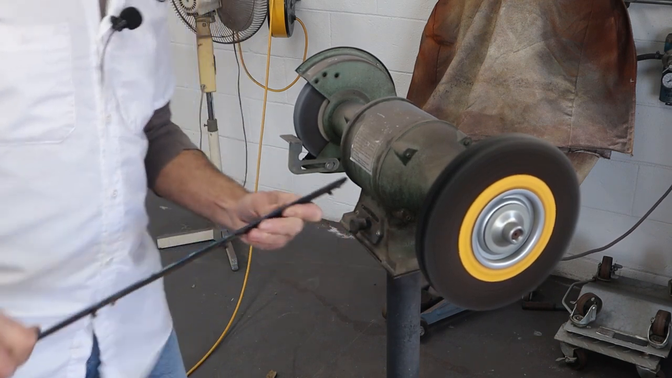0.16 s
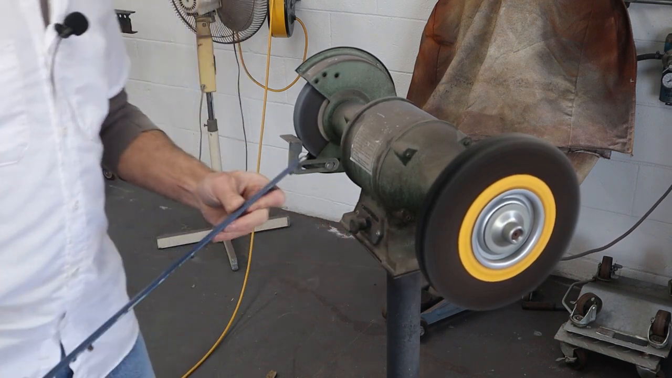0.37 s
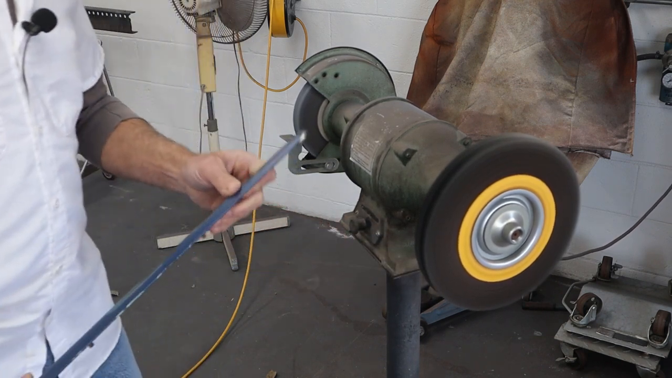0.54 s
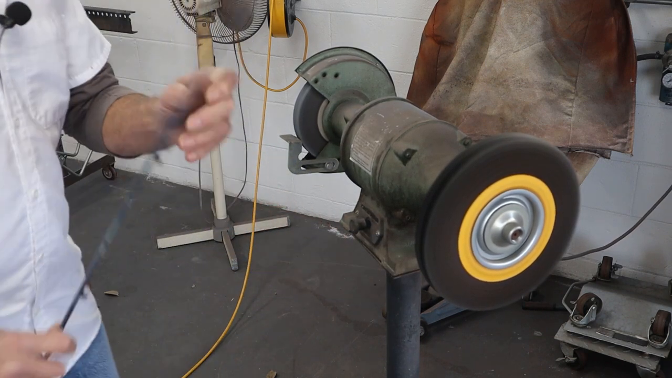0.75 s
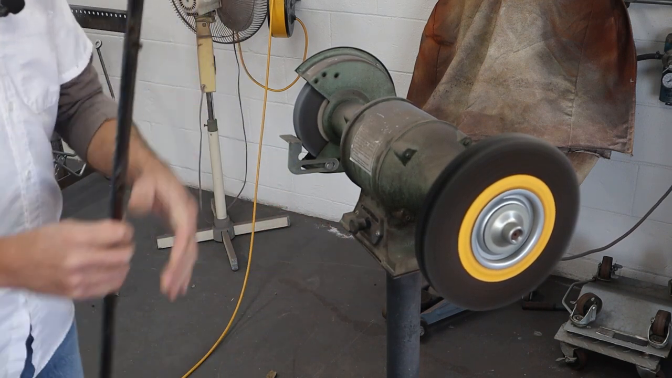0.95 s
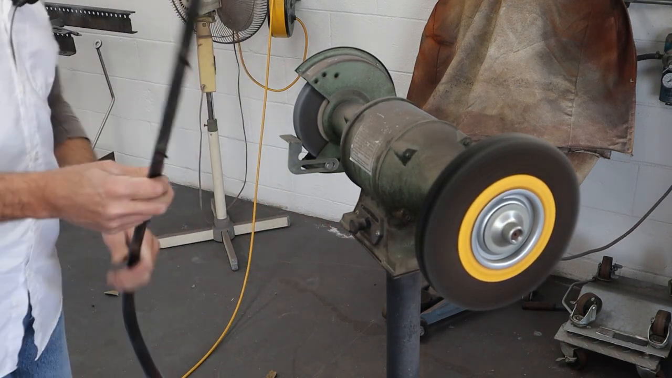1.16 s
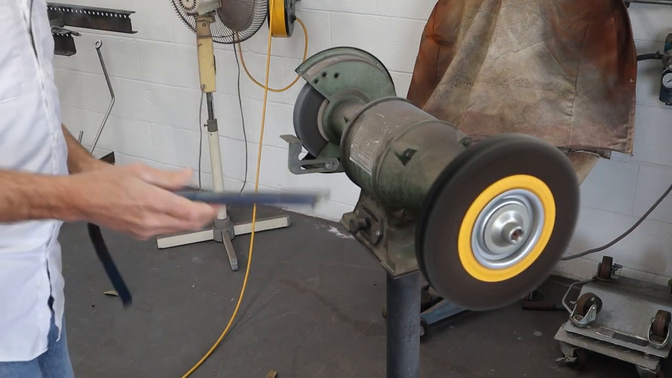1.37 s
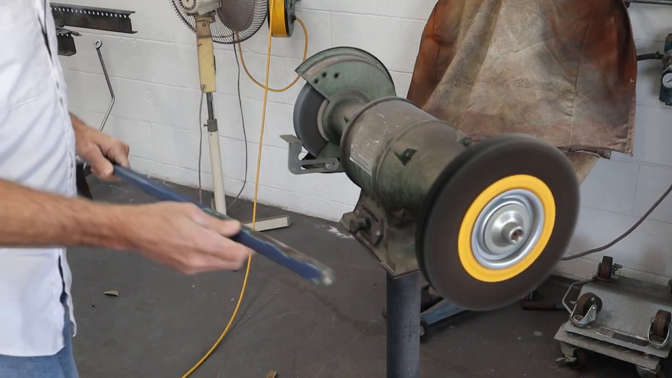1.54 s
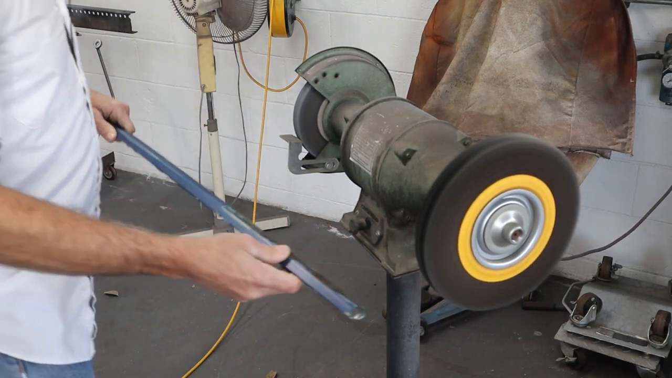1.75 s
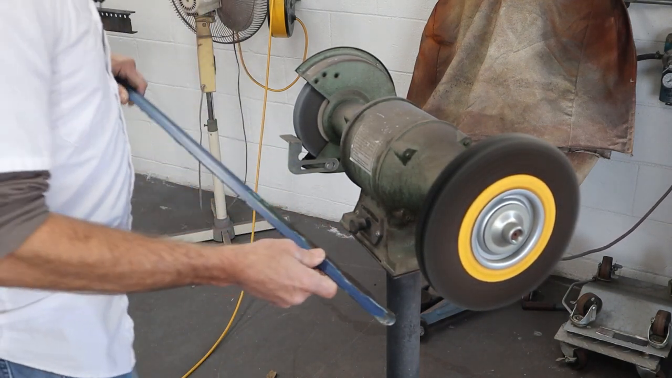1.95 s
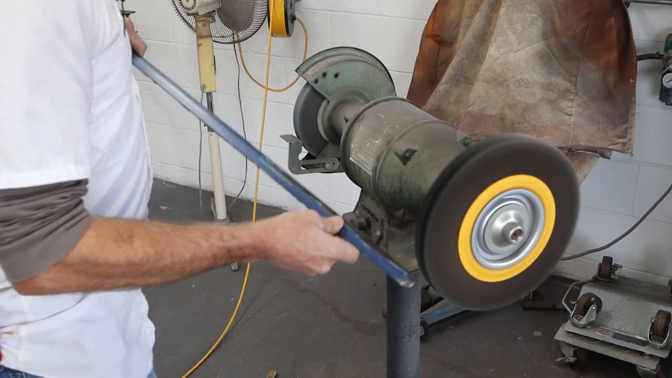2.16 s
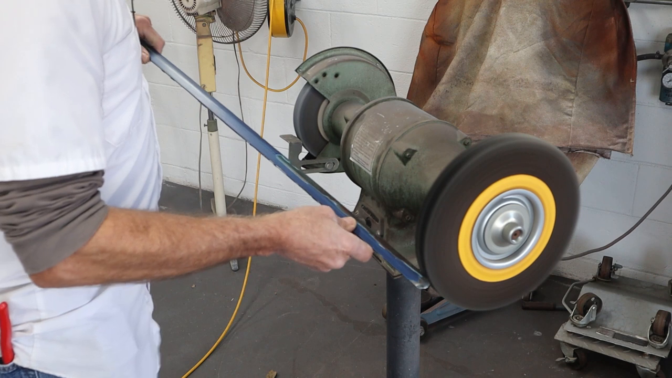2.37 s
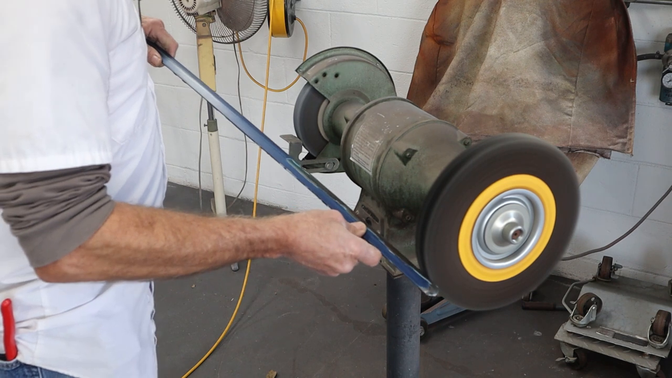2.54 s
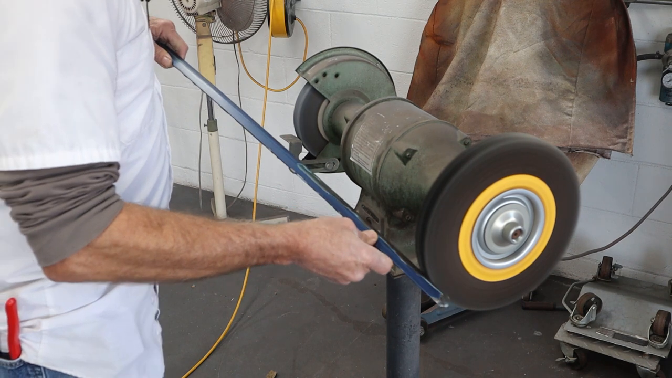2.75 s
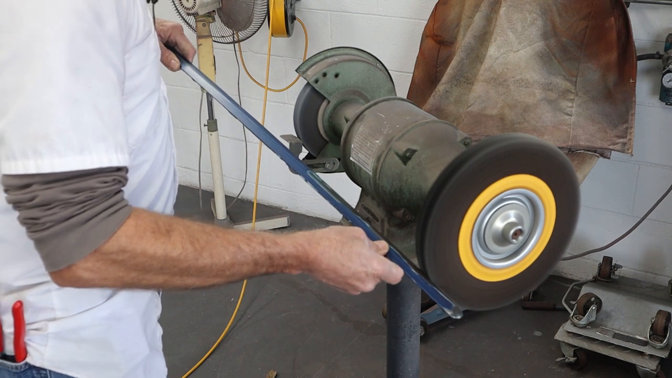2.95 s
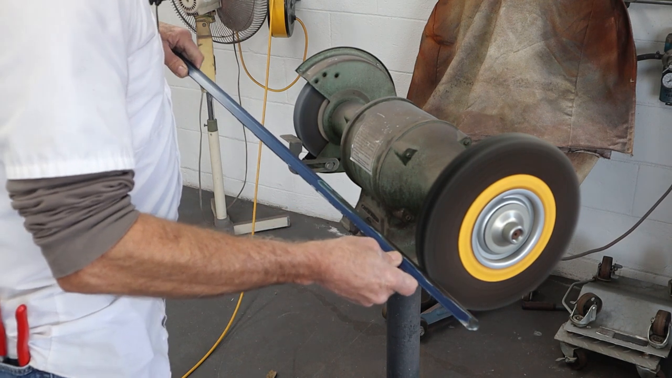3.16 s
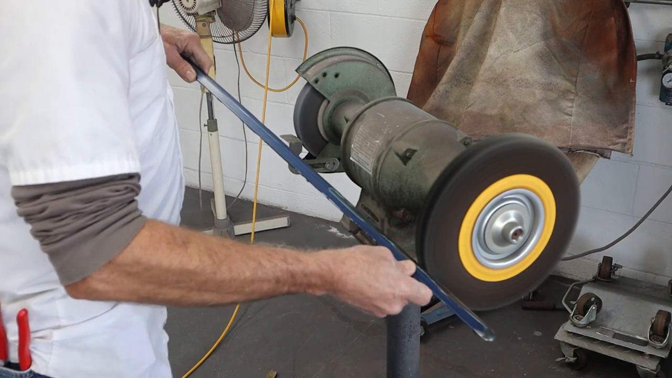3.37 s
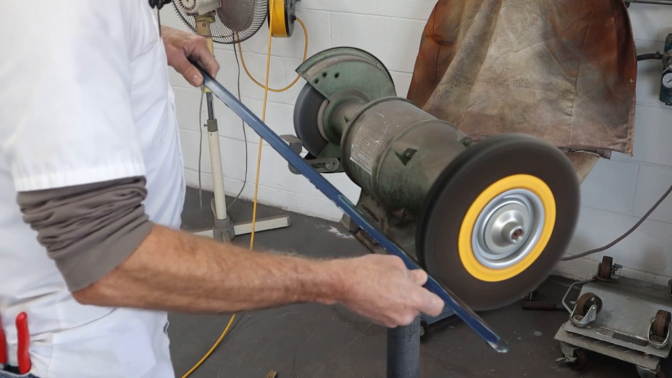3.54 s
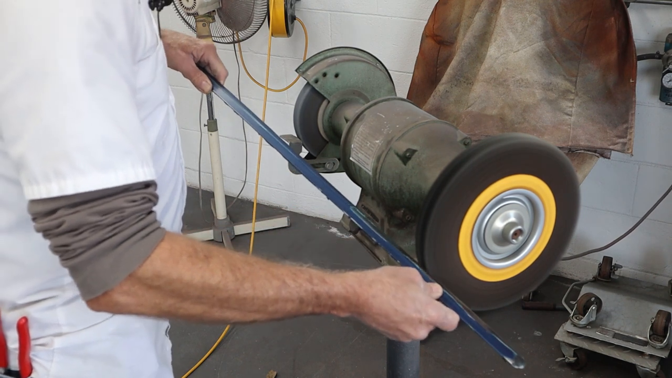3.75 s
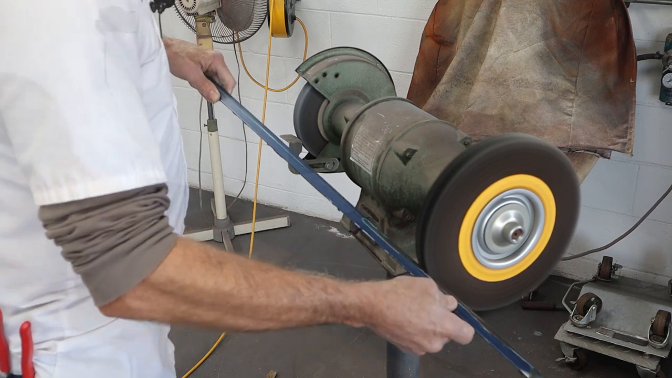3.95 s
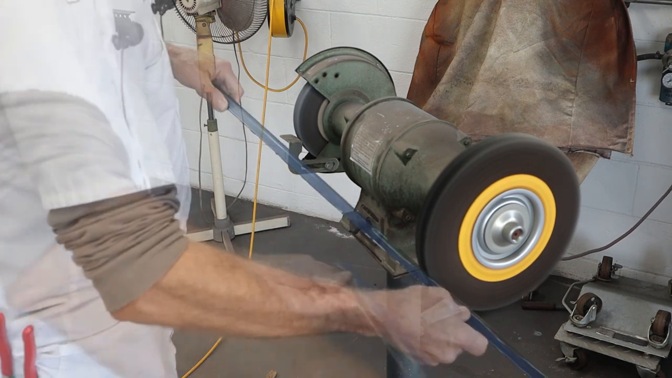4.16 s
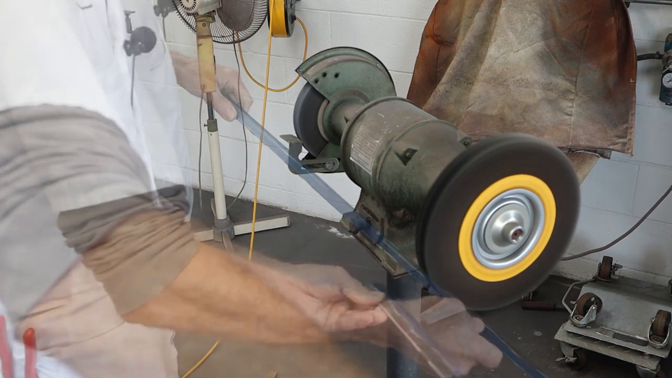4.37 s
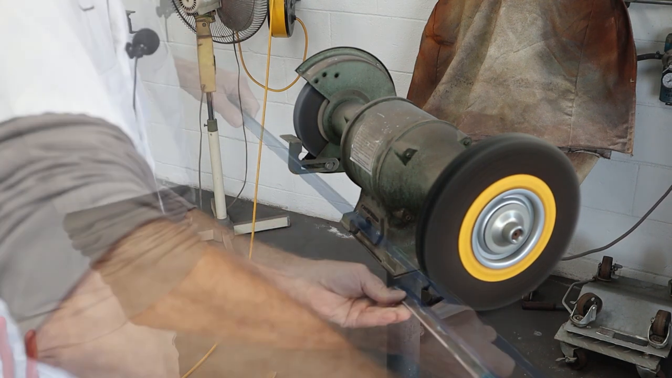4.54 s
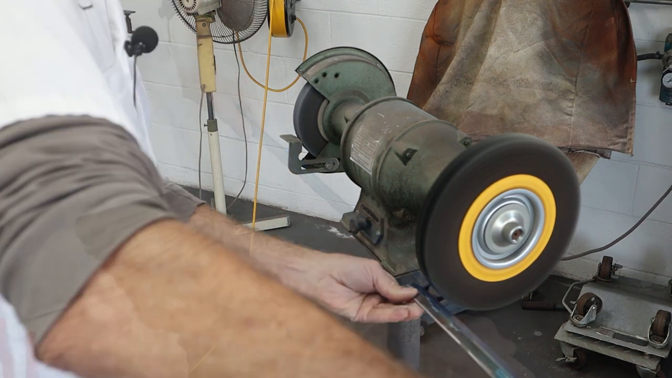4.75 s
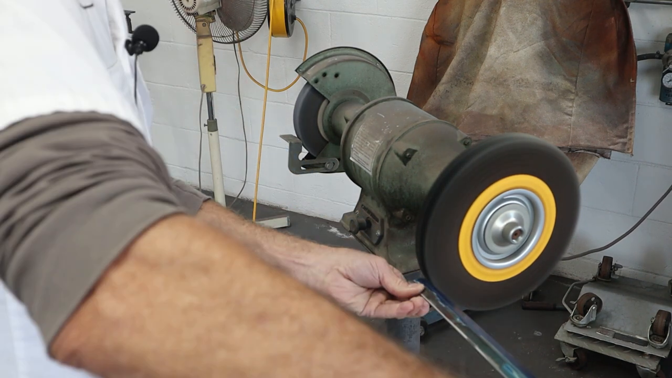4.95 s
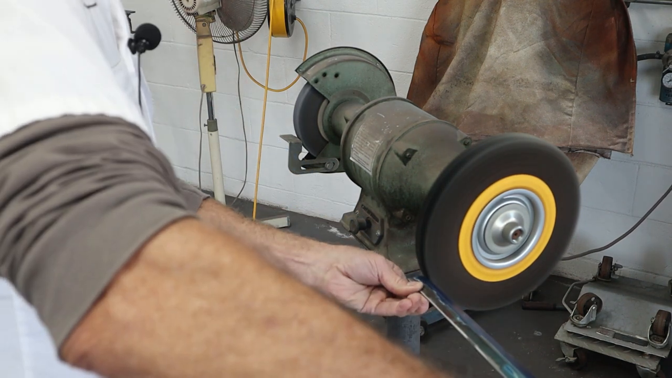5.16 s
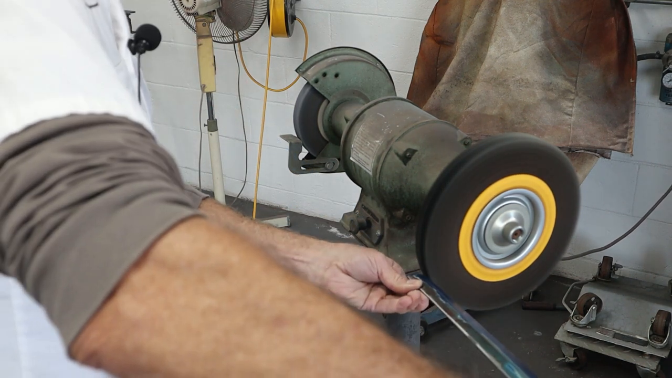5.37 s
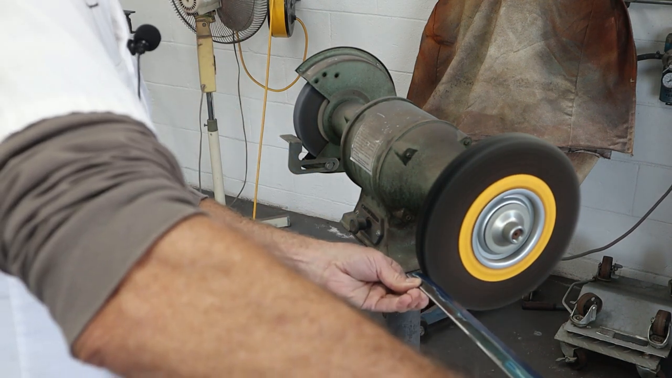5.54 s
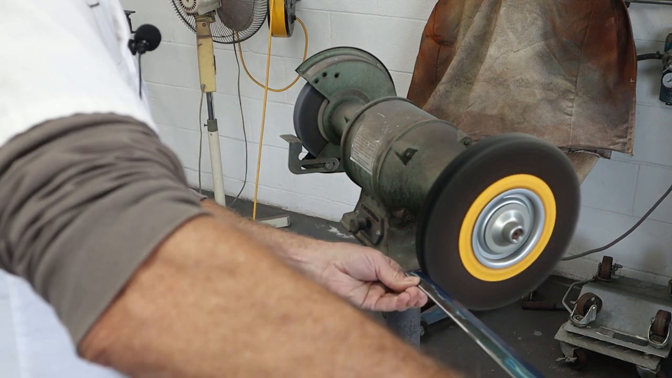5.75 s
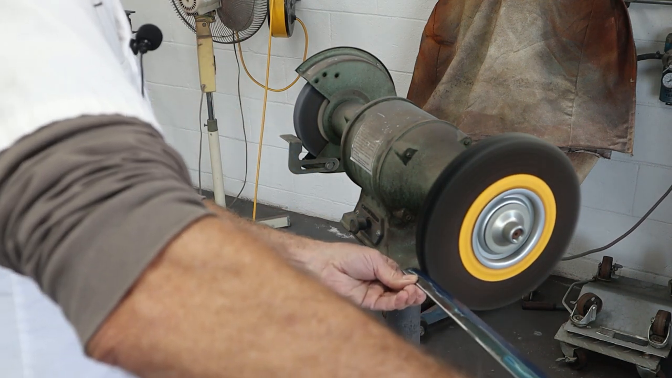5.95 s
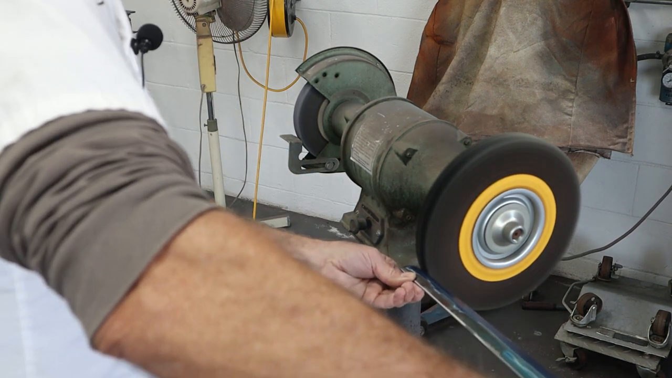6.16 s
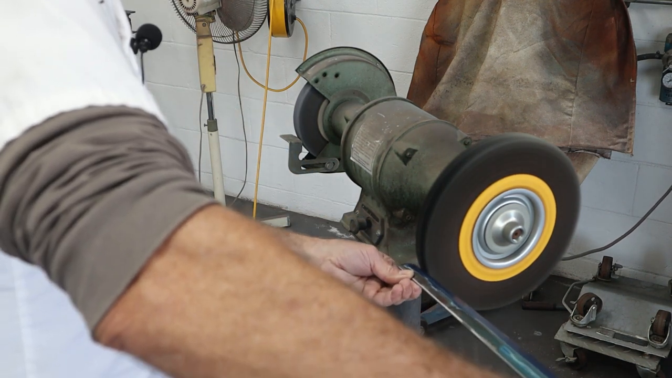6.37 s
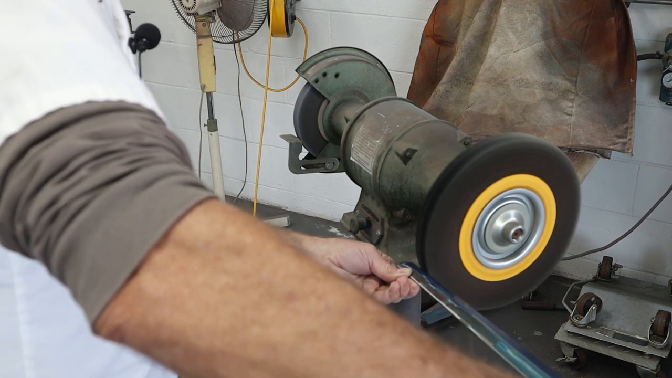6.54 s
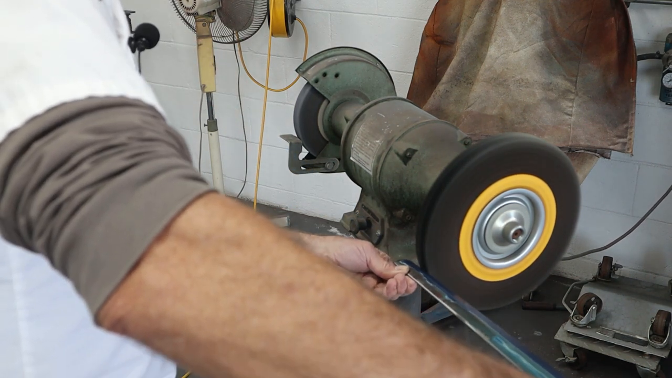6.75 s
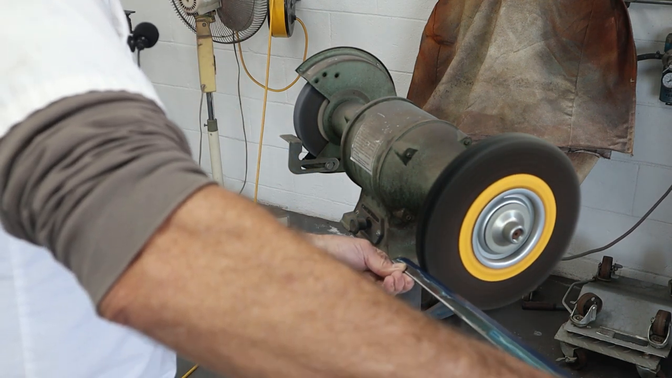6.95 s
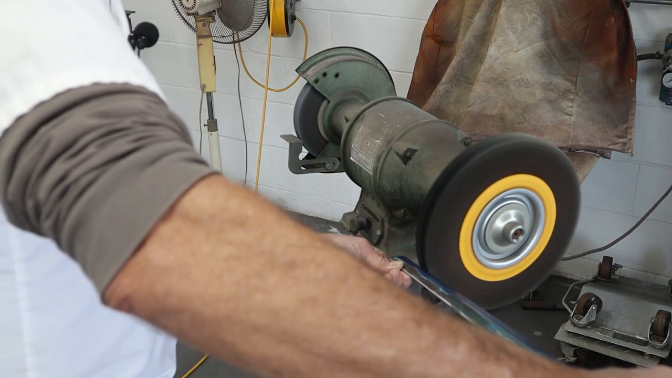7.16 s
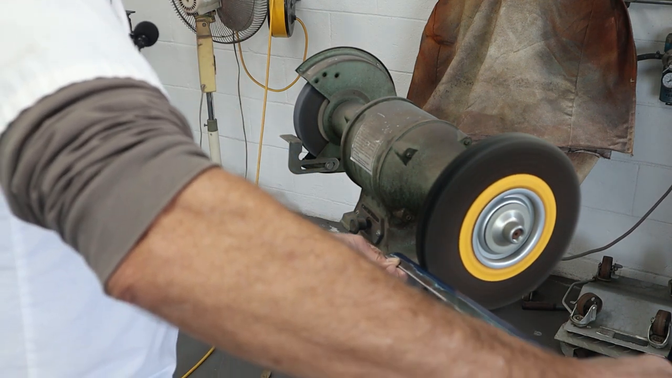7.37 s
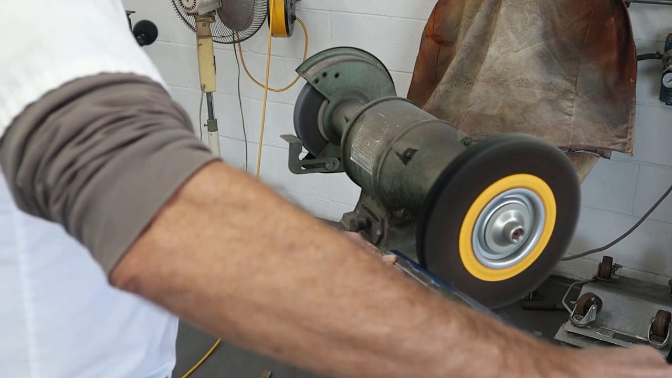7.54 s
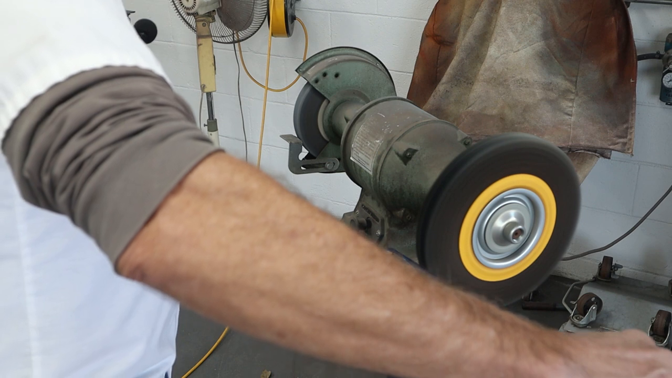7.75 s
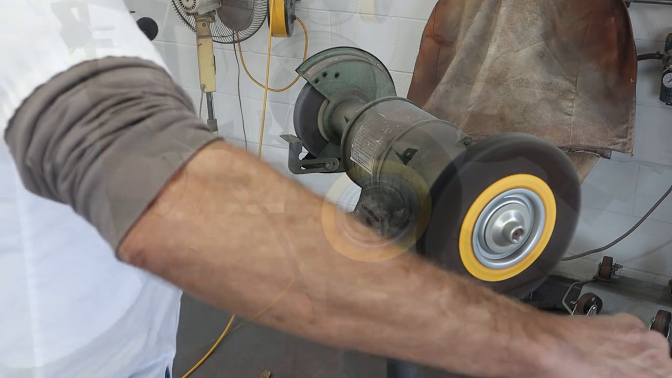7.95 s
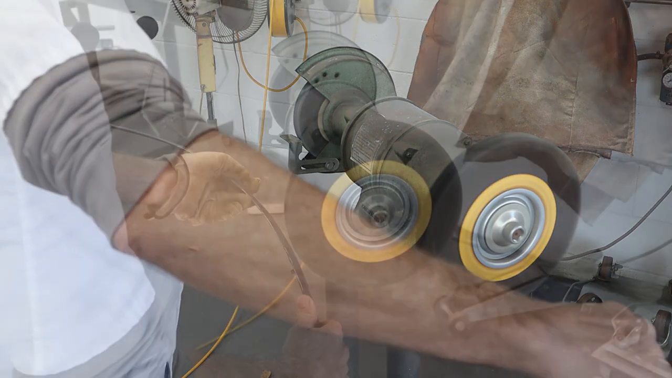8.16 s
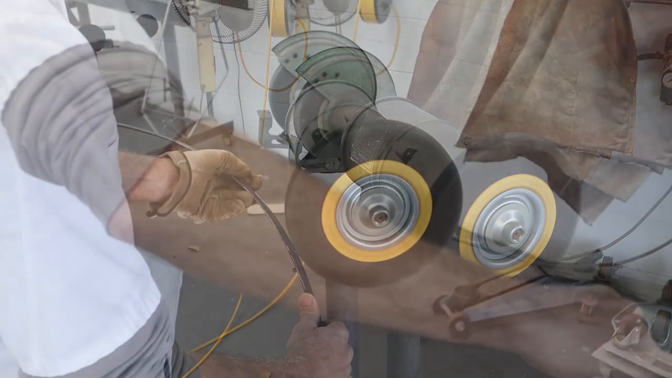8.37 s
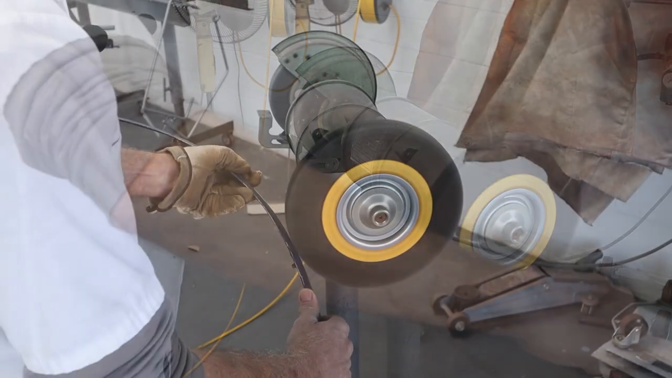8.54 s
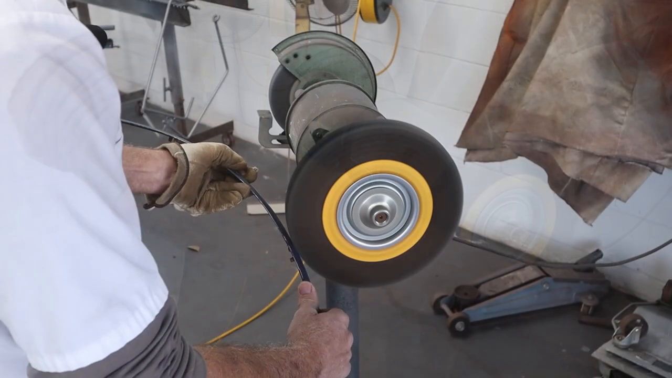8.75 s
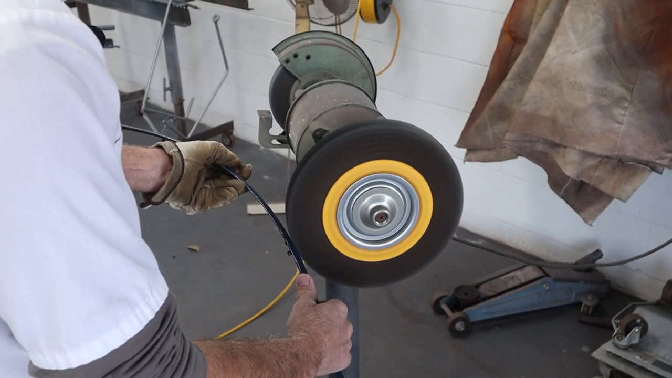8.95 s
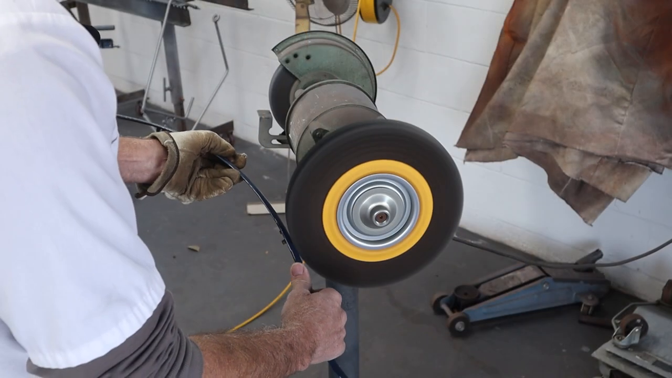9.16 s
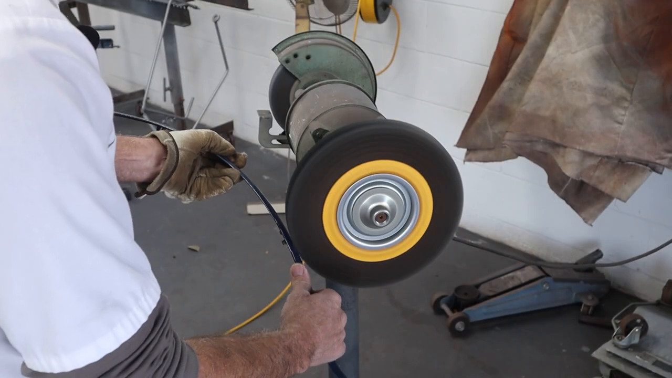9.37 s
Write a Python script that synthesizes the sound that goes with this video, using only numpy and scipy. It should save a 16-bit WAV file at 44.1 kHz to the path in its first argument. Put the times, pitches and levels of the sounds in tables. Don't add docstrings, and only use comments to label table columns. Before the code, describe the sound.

A bench grinder's wire wheel spins freely in a workshop, with a high breathy whistle, rushing air and a wavering motor hum. Soft low puffs of draught bump the lapel microphone until about 0.9 s, then the wheel is heard more cleanly. At 2.4 s a steel strip meets the bristles: a sudden loud, bright rasp, ringing and shifting in resonance, roughened by the rotation as the wheel slows. Wind thumps return from about 3.2 s. At 4.4 s the scrape cuts off and heavy, irregular low buffeting takes over the idling wheel. From 5.2 s a softer, thin, hissy scrape continues beneath these thuds, with brief dips in level. At 8.4 s the sound changes abruptly to a third, stronger scrape, with a buzzing body and a steady singing tone sinking slightly; the buffeting dies away and grinding continues to the end, about 9.4 s.

```python
import sys
import numpy as np
from scipy import signal
from scipy.fft import rfft, irfft, next_fast_len
from scipy.io import wavfile
from scipy.ndimage import uniform_filter1d, map_coordinates

SR = 44100
rng = np.random.default_rng(int(sys.argv[2]) if len(sys.argv) > 2 else 0)


def inscribe(sig):
    pcm = np.round(np.clip(np.atleast_2d(sig).T, -1, 1) * 32767)
    wavfile.write(sys.argv[1], SR, pcm.astype(np.int16))


def level_to_linear(level):
    exponent = np.asarray(level, float) / 20
    return 10 ** exponent


N = 414540


def unit(x):
    return x / np.sqrt(np.mean(x ** 2) + 1e-20)


def clock():
    return np.arange(N) / SR


def along(points, hz):
    f, v = np.transpose(points)
    return np.interp(np.log(hz + 1), np.log(f + 1), v)


def curves(rows, t=None):
    s, *columns = np.transpose(rows)
    t = clock() if t is None else t
    return [np.interp(t, s, column) for column in columns]


def wobble(rate):
    knots = rng.standard_normal(int(N * rate / SR) + 4)
    return map_coordinates(knots, [np.arange(N) * rate / SR])


def spell(t, start, stop, rise_s, fall_s):
    return np.clip(np.minimum((t - start) / rise_s, (stop - t) / fall_s), 0, 1)


def filtered(x, gain):
    m = next_fast_len(N + 8192)
    return irfft(rfft(x, m) * gain(np.fft.rfftfreq(m, 1 / SR)), m)[..., :N]


def hiss(spectrum):
    return unit(filtered(rng.standard_normal(N), lambda hz: level_to_linear(along(spectrum, hz))))


# start_s, turns_per_s
SHAFT_SPEED = [(2.38, 58), (2.6, 56.5), (2.85, 55.47), (3.6, 53.5), (4.1, 51.7), (4.42, 50.3), (4.45, 58),
               (5.18, 57.6), (5.35, 56.6), (5.6, 55.75), (6.35, 52.7), (6.85, 50.98), (7.35, 49.61),
               (7.85, 48.55), (8.38, 47.7), (8.4, 56.4), (8.6, 55.6), (9.4, 51.9)]


def shaft_turns():
    return np.cumsum(curves(SHAFT_SPEED)[0]) / SR


# start_s, level_db
IDLE_WHISTLE = [
    (0, -34),
    (.92, -39.5),
    (1.05, -38.5),
    (2.38, -37),
    (4.43, -43),
    (5.19, -49.5),
]
# pitch_hz, level_db (per Hz)
TIP_COLOUR = [(3000, -36), (4500, -13.5), (5900, -1.5), (7300, -8), (9000, -10), (15900, -16)]
# pitch_hz, level_db (per Hz)
RUSH_COLOUR = [(30, -10), (60, -11), (123, -23), (250, -18.5), (430, -12), (730, -17), (1100, -13.5),
               (2000, -16.5), (3500, -18), (8500, -19.5), (15900, -32)]
# pitch_hz, level_db (rms)
MOTOR_TONES = [(120, -57.5), (409, -45.5), (479, -57.5), (522, -70), (1098, -60), (1174, -61)]
# start_s, stop_s, lift_db
STAND_RINGS = [
    (.8, 2.71, 13.5),
    (8.6, 9.7, 5.5),
]


def motor():
    whistle_db, = curves(IDLE_WHISTLE)
    angle = 2 * np.pi * shaft_turns()
    rush_db = -47.5 + 0.44 * (whistle_db + 37)
    air = level_to_linear(whistle_db + 3.0) * hiss(TIP_COLOUR) + level_to_linear(rush_db + 9.0) * hiss(RUSH_COLOUR)
    beat_db = 0.29 * np.sin(angle) + 0.44 * wobble(18.0)
    t = clock() + 0.00041 * wobble(5)
    tones = sum(level_to_linear(db + 2.0) * np.sin(2 * np.pi * hz * t) for hz, db in MOTOR_TONES)
    rest_db, fade_s = -13, 0.22
    lift_db = sum(db * spell(t, start - fade_s / 2, stop, fade_s, fade_s) for start, stop, db in STAND_RINGS)
    return level_to_linear(beat_db) * air + tones * level_to_linear(rest_db + lift_db + wobble(6.8))


# start_s, level_db
DRAUGHT_LEVEL = [(0, -36.5), (.41, -31.5), (.77, -37), (.95, -52), (1.6, -65), (2.25, -63), (2.5, -40.5),
                 (3.17, -35), (3.24, -27), (4.41, -32), (4.42, -20), (5.8, -20.5), (6.5, -22), (7.3, -24),
                 (8.37, -23), (8.39, -31.5), (8.7, -46), (9.4, -52)]
# time_s, depth_db, length_ms
LULLS = [(.16, 10, 54), (.37, 7, 50), (.63, 9, 80), (.79, 8, 50), (1.08, 10, 130), (3.94, 6, 90),
         (3.02, 18, 106), (5.03, 2, 28), (5.14, 4, 45), (6.02, 7, 72), (6.58, 3.5, 89), (6.74, 3.5, 120),
         (7.06, 6, 44), (7.41, 4, 67), (7.65, 9.5, 44), (7.87, 7, 27), (8.07, 4.5, 73)]


def buffet_db(t):
    lull_db = sum(db * np.exp(-(2000 * (t - s) / ms) ** 2) for s, db, ms in LULLS)
    return curves(DRAUGHT_LEVEL, t)[0] - lull_db


USUAL_EDDY_MS = 16.6


def lesser_eddies():
    gap_s, lift_db, spread_db, flutter_db = 0.13, 9, 2, -17.5
    luck = rng.standard_normal((80, 3))
    s = 0.1 + np.cumsum(gap_s * np.exp(0.4 * luck[:, 0]))
    db = buffet_db(s) + lift_db + spread_db * luck[:, 1]
    ms = USUAL_EDDY_MS * np.exp(0.34 * luck[:, 2])
    rows = np.transpose([s, db, ms, np.full_like(s, flutter_db)])
    return list(rows[s < N / SR - 0.1])


# crest_s, peak_db, length_ms, flutter_db (relative to the peak)
STRONG_EDDIES = [(.27, -15, 51, -9.5), (.475, -15.5, 51, -11.5), (.712, -17.5, 40, -11.5),
                 (.845, -22, 33, -17.5), (2.884, -25.5, 31, -13), (3.228, -10.5, 25, -16),
                 (3.483, -12, 13, -17), (3.595, -13.5, 30, -22), (3.795, -6.5, 14, -27),
                 (4.455, -5, 17.5, -13.5), (4.668, -3, 12, -18), (4.872, -11, 14, -15), (4.97, -2, 18, -34),
                 (5.089, -5.5, 7, -15), (5.242, -9, 13, -32), (5.41, -8.5, 19, -9.5),
                 (5.517, 0.5, 10.5, -25), (5.74, -8, 15, -19), (5.915, -3.5, 23, -20),
                 (6.139, -5.5, 25, -18.5), (6.306, -5, 10, -29), (6.434, -3, 9.9, -30), (6.49, -4, 10, -35),
                 (6.655, 0, 6.8, -23.5), (6.973, -8, 17, -23), (7.574, -7, 8.2, -20),
                 (7.8, -12.5, 38, -14.5), (8.16, -13.5, 20, -8.5), (8.253, -14, 22, -14),
                 (8.361, -12.5, 17, -14.5)]
# pitch_hz, level_db (per Hz)
RUMBLE_COLOUR = [(11, -44), (18, -12.5), (58, 6.5), (102, -1.5), (140, -0.5), (400, -27), (520, -48),
                 (880, -120)]
# pitch_hz, level_db (per Hz)
FLUTTER_COLOUR = [(130, -23), (220, 1), (400, -8.5), (584, -17), (1650, -36), (1800, -34), (2340, -65),
                  (3960, -120)]


def draught():
    grid_s = np.arange(0, N, 32) / SR
    lumps = unit(level_to_linear(0.34 * wobble(12.0) + 2.9 * wobble(30)))
    bed = level_to_linear(np.interp(clock(), grid_s, buffet_db(grid_s)) + 5.0) * lumps
    eddies, crests = np.zeros(N), level_to_linear(-15.5) * bed
    half = 2500
    t = np.arange(-half, half) / SR
    luck = rng.random((110, 2))
    for (s, db, ms, flutter_db), (phase, pitch) in zip(list(STRONG_EDDIES) + lesser_eddies(), luck):
        hz = 104.9 * (USUAL_EDDY_MS / ms) ** 0.17
        hz = hz * (1 + 0.14 * (2 * pitch - 1))
        shape = np.exp(-(t / (0.00053 * ms + 0.00054)) ** 2)
        swing = np.sin(2 * np.pi * (hz * t + phase))
        shove = 0.83 * np.sin(0.9 * np.pi * (hz * t + 3 * phase))
        edge = 0.33 * np.sin(3.6 * np.pi * (hz * t - phase))
        at = slice(round(s * SR) - half, round(s * SR) + half)
        eddies[at] += level_to_linear(db) * shape * (swing + shove + edge)
        crests[at] += level_to_linear(db + flutter_db - 1.0) * shape ** 0.91
    flutter = crests * level_to_linear(2.8 * wobble(60)) * hiss(FLUTTER_COLOUR)
    return bed * hiss(RUMBLE_COLOUR) + eddies + flutter


# pitch_hz, share (0 to 1)
REPEATING_SHARE = [(500, .4), (1200, .82), (2500, .88), (5000, .86), (12000, .6)]


def wires():
    size = 1024
    turns = shaft_turns()
    shape = (int(turns[-1]) + 2, size)
    keep = np.exp(-1 / 20)

    def worn():
        return unit(signal.lfilter([1], [1, -keep], rng.standard_normal(shape), axis=0))

    def read(rim):
        return unit(map_coordinates(rim.ravel(), [turns * size]))

    def share(hz):
        return np.clip(along(REPEATING_SHARE, hz), 0, 1)

    tufts = level_to_linear(1.6 * unit(uniform_filter1d(worn(), size=40, axis=1, mode="wrap")))
    orders = rfft(worn() * tufts, axis=1) * level_to_linear(1.7 * worn()[:, :size // 2 + 1])
    same = read(irfft(orders, size, axis=1))
    fresh = read(tufts * rng.standard_normal(shape))
    return filtered(same, lambda hz: np.sqrt(share(hz))) + filtered(fresh, lambda hz: np.sqrt(1 - share(hz)))


# start_s, level_db, pitch_hz (loudest strip mode)
PASSES = [
    [(2.39, -21.5, 6100), (2.54, -17, 5800), (2.81, -23, 5300), (3.12, -20, 5530), (3.46, -18, 5700),
     (3.84, -16, 6070), (4.0, -21.5, 5960), (4.13, -15.5, 6000), (4.43, -18, 5440)],
    [(5.19, -42, 5950), (5.46, -31.5, 5800), (5.9, -32, 5500), (6.6, -33.5, 5870), (7.21, -28.5, 5090),
     (7.52, -33, 6300), (7.68, -30.5, 5700), (8.0, -30, 5780), (8.39, -28, 5650)],
    [(8.39, -32.5, 6260), (8.72, -25, 5840), (8.78, -26, 5400), (8.94, -23, 5330), (9.19, -23, 5600),
     (9.41, -23, 6500)],
]
# pitch_hz, level_db (per Hz)
PASS_COLOURS = [
    [(530, -22), (900, -25.5), (3260, -13.5), (3810, -10), (4610, -10.5), (5020, -7), (6080, -1.5),
     (7550, -7.5), (14400, -16.5), (15900, -24)],
    [(710, -48), (1200, -18.5), (3070, -12), (3460, -7.5), (3900, -12), (4890, -4.5), (5630, -3.5),
     (9670, -10.5), (11900, -10), (15900, -17.5)],
    [(290, -24.5), (500, -13.5), (973, -22), (1500, -6.5), (2010, -18), (2720, -16), (3280, -14.5),
     (4450, -10), (5220, -2), (15900, -20.5)],
]
# start_s, stop_s, pitch_hz (at start), lift_db
STRIP_MODES = [(2.33, 2.54, 4880, 18.5), (2.6, 2.74, 4540, 16), (2.47, 2.74, 5200, 8), (2.3, 2.4, 2800, 8),
               (2.46, 2.63, 6500, 5), (2.65, 2.97, 4110, 10.5), (2.72, 2.97, 3780, 8.5),
               (3.02, 3.27, 4000, 13), (3.55, 3.85, 2900, 4), (3.16, 3.67, 5050, 8.5),
               (3.85, 4.15, 3880, 7.5), (3.6, 4.4, 5230, 8), (4.15, 4.43, 8600, 8), (5.16, 5.4, 3670, 16.5),
               (5.1, 5.5, 7170, 8.5), (5.4, 6.6, 12200, 5), (6.2, 6.6, 12000, 8), (6, 7.6, 12200, 3),
               (7.6, 8.39, 12200, 9), (5.75, 6.6, 3620, 4.5), (8.2, 8.39, 3450, 2), (6.8, 7.35, 5050, 7),
               (7.6, 7.88, 4500, 5), (7.7, 8.02, 8100, 5), (7.7, 8.02, 10800, 9.5), (6.5, 8.05, 8720, 3.5),
               (6.1, 7.6, 11000, 2.5), (8.55, 9.5, 2710, 9.5), (9.15, 9.4, 2810, 13.5),
               (8.39, 11, 3910, 9.5)]


def scrape():
    hz, t, strikes = signal.stft(wires(), SR, nperseg=512, noverlap=384)
    hz, speed = hz[:, None], curves(SHAFT_SPEED, t)[0]

    def bump(centre_hz, width_hz):
        return 1 / (1 + (2 * (hz - centre_hz) / width_hz) ** 2)

    mottle = uniform_filter1d(rng.standard_normal(strikes.shape), size=2, axis=0)
    mottle = uniform_filter1d(mottle, size=60, axis=1)
    ring_db = unit(mottle) * np.clip(hz / 3200, 1.2, 2.1)
    for start, stop, mode_hz, lift_db in STRIP_MODES:
        alive = np.clip(np.minimum(t - start, stop - t) / 0.066 + 0.5, 0, 1)
        on = alive > 0
        sunk_hz = mode_hz * (speed[on] / np.interp(start + 0.046, t, speed)) ** 0.74
        width_hz = 91 + 0.027 * mode_hz
        ring_db[:, on] += lift_db * alive[on] * bump(sunk_hz, width_hz)
    touch_s, end_s = 0.017, 0.0075
    out = np.zeros(N)
    for rows, colour in zip(PASSES, PASS_COLOURS):
        level_db, mode_hz = curves(rows, t)
        swell_db = level_db - np.mean(rows, axis=0)[1]
        gain_db = along(colour, hz) + ring_db + 4 * bump(mode_hz, width_hz=640)
        gain_db = gain_db - 0.98 * swell_db / (1 + (hz / 4300) ** 8)
        gain_db = gain_db - 0.87 * swell_db / (1 + (8500 / (hz + 1)) ** 8)
        power = np.mean(level_to_linear(gain_db[50:93]) ** 2, axis=0)
        rung = signal.istft(strikes * level_to_linear(gain_db) / np.sqrt(power), SR, nperseg=512, noverlap=384)[1][:N]
        contact = spell(clock(), rows[0][0] - touch_s / 2, rows[-1][0], touch_s, end_s)
        tremor_db = 0.68 * wobble(13)
        out += contact * rung * level_to_linear(curves(rows)[0] + 8.5 + tremor_db)
    return out


# start_s, stop_s, order (cycles per turn), level_db (rms)
BUNCH_TONES = [
    (4.13, 4.43, 25, -46),
    (8.39, 9.5, 28, -42),
    (8.5, 9.5, 49, -50),
    (8.85, 9.5, 25, -46),
    (5.88, 6.13, 30, -56),
    (7.95, 8.39, 40, -55),
]


def bunches():
    t, angle = clock(), 2 * np.pi * shaft_turns()
    out, sway_db, slip = np.zeros(N), 0.87 * wobble(12), 0.4 * wobble(7.1)
    for start, stop, order, db in BUNCH_TONES:
        alive = spell(t, start, stop, 0.022, 0.022)
        out += alive * level_to_linear(db + 3.0) * np.sin(np.round(order) * angle + slip)
    return out * level_to_linear(sway_db)


def scene():
    return np.tile(motor() + draught() + scrape() + bunches(), (2, 1))


def roll_off(x):
    return signal.sosfilt(signal.butter(12, 16270, fs=SR, output="sos"), x)


# time_s, depth_db, length_ms
GAIN_DIPS = [(2.465, 4, 31), (3.517, 1.5, 10), (5.039, 5, 31), (5.138, 3, 49), (5.518, 5, 9.6),
             (5.635, 6.5, 11), (5.94, 4, 18), (6.126, 4.5, 25), (6.511, 5, 15), (6.694, 4, 36),
             (6.837, 3.5, 44), (6.89, 2.5, 14), (7.047, 2, 41), (7.398, 2.5, 34), (7.871, 4.5, 29),
             (8.393, 0, 32)]


def record(dry):
    grid_s = np.arange(0, N / SR, 0.001)
    duck_db = sum(db * np.exp(-((grid_s - s) / (0.0005 * ms)) ** 4) for s, db, ms in GAIN_DIPS)
    gain = level_to_linear(-1.2 * np.interp(clock(), grid_s, duck_db))
    x = filtered(dry * gain, lambda hz: (hz < 15750) * hz ** 2 / (hz ** 2 + 34 ** 2))
    x = x / (1 + np.abs(x / 0.91) ** 6) ** (1 / 6)
    return roll_off(x)


dry = scene()
out = record(dry)
inscribe(out)
```